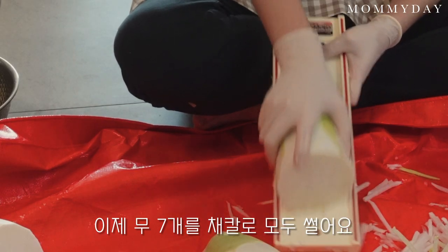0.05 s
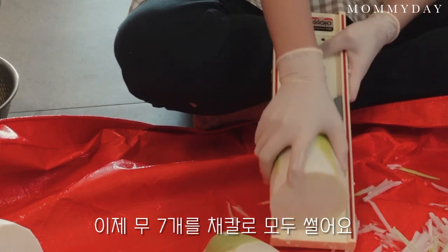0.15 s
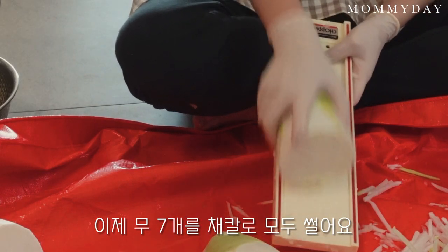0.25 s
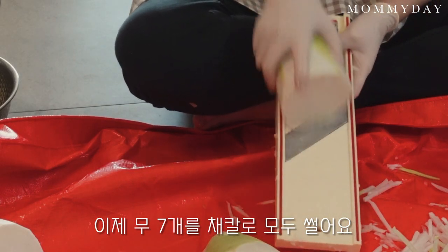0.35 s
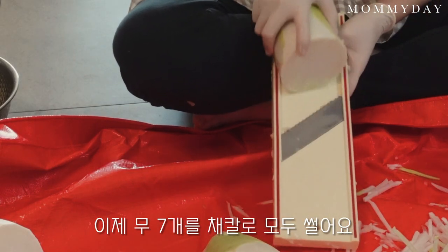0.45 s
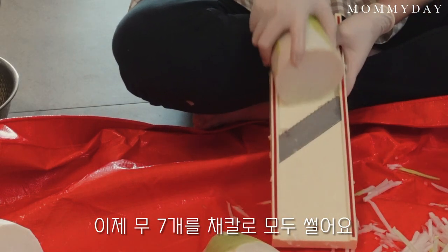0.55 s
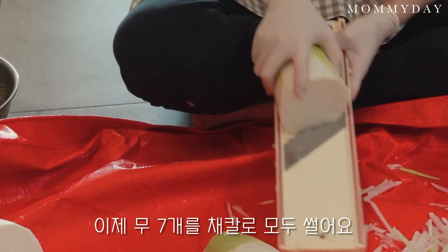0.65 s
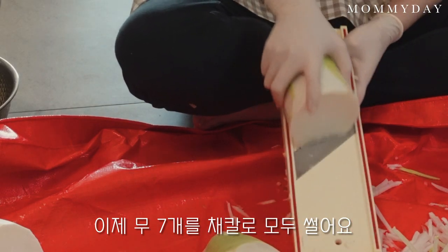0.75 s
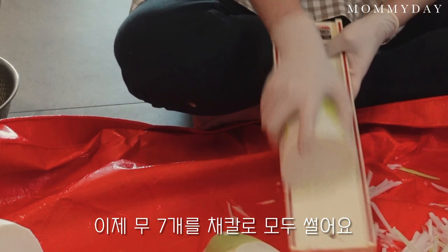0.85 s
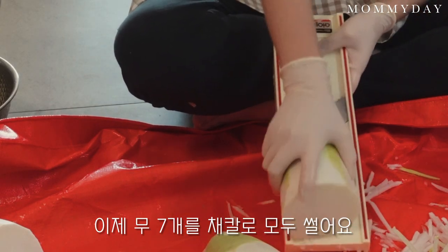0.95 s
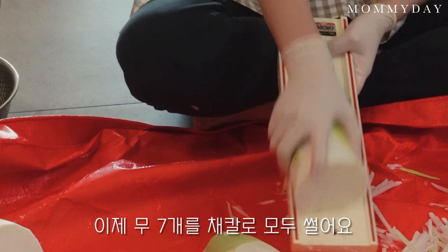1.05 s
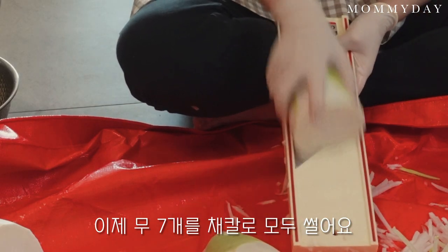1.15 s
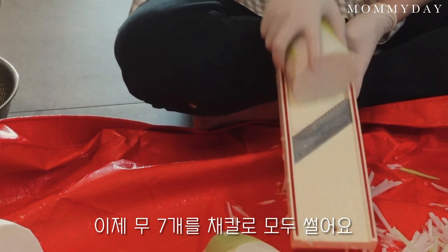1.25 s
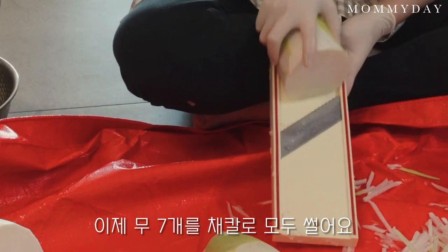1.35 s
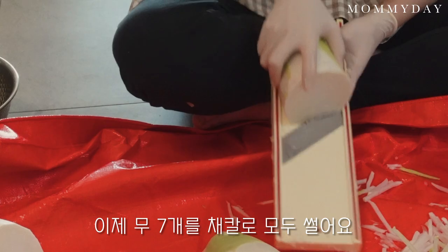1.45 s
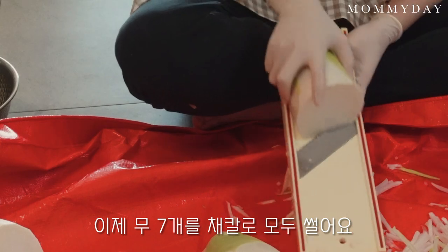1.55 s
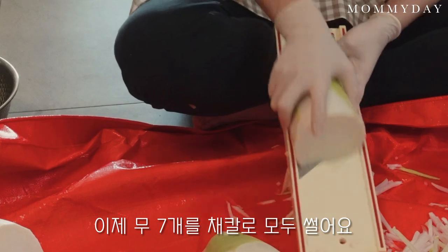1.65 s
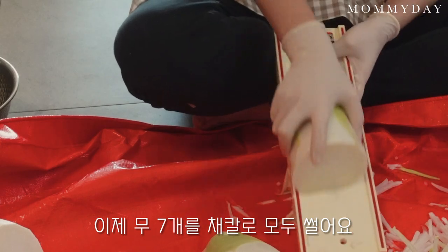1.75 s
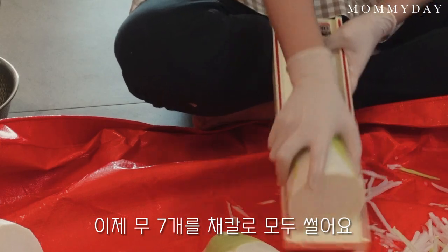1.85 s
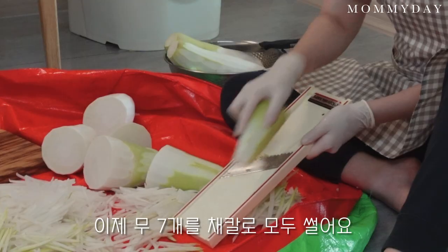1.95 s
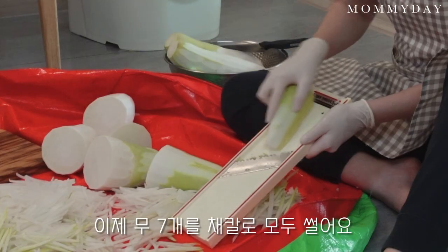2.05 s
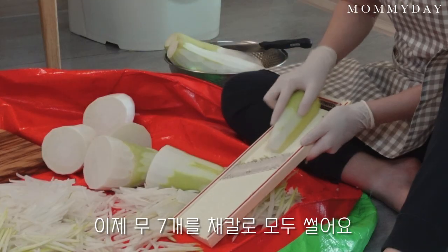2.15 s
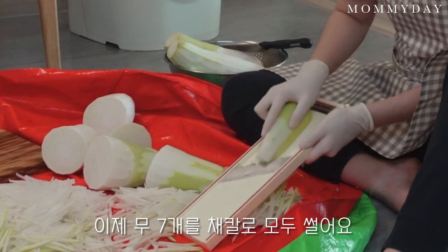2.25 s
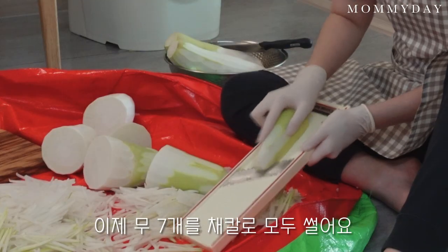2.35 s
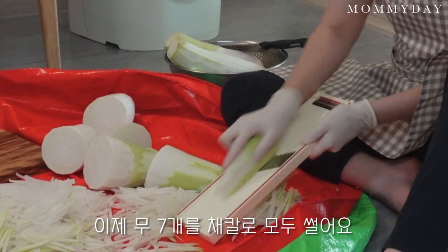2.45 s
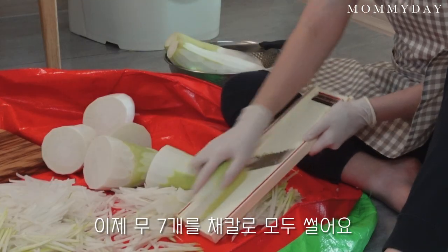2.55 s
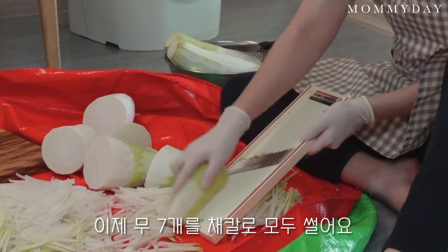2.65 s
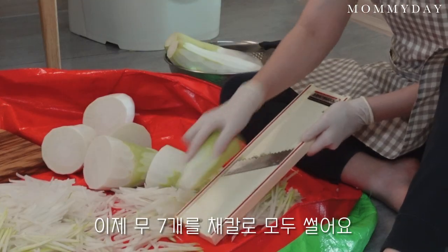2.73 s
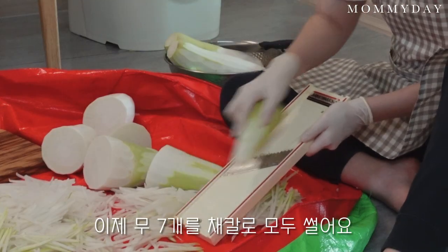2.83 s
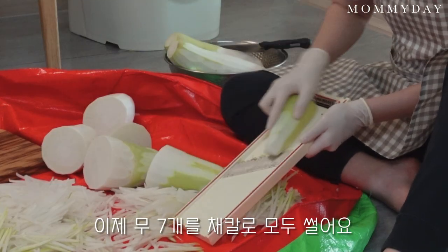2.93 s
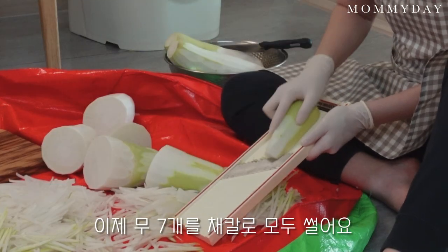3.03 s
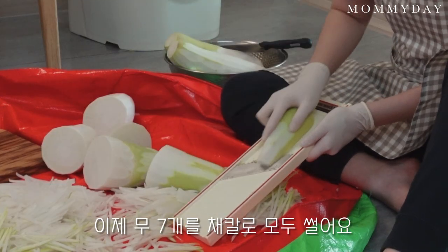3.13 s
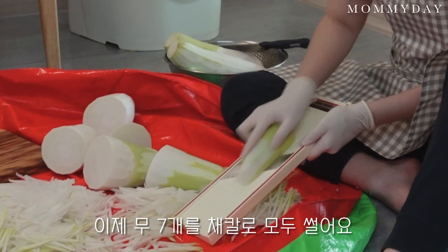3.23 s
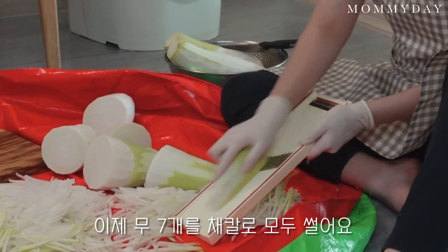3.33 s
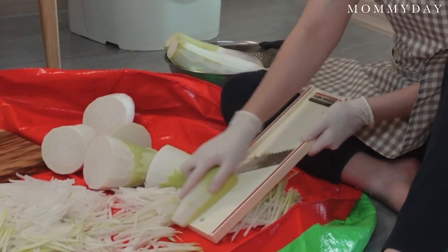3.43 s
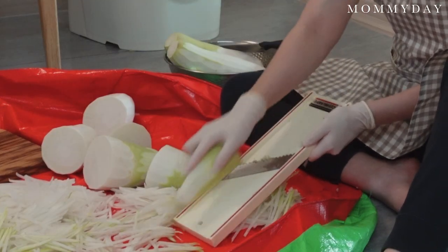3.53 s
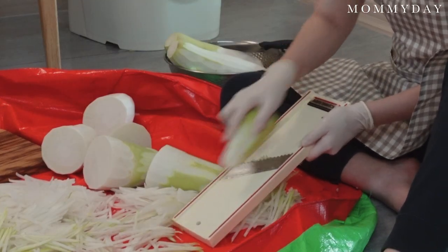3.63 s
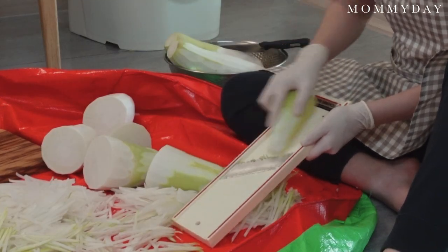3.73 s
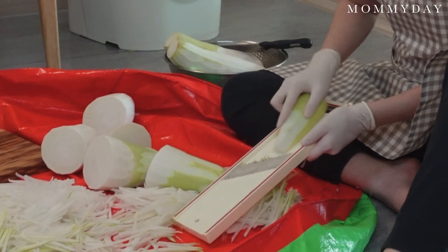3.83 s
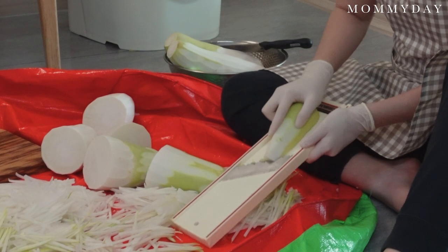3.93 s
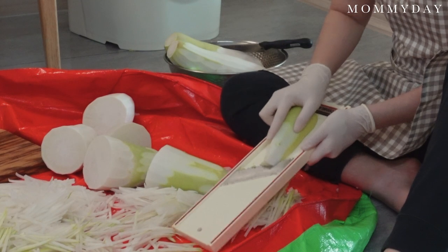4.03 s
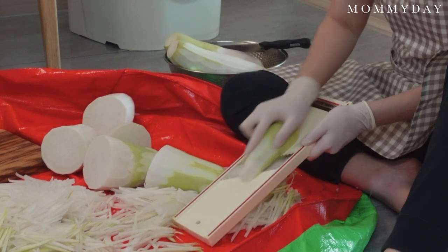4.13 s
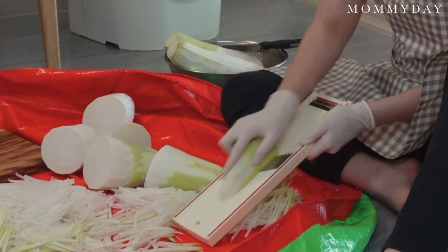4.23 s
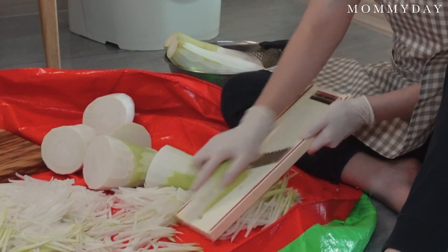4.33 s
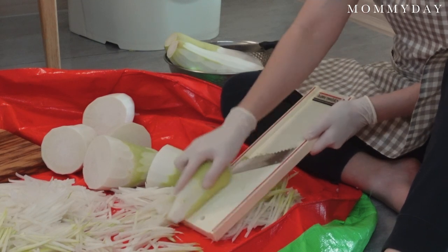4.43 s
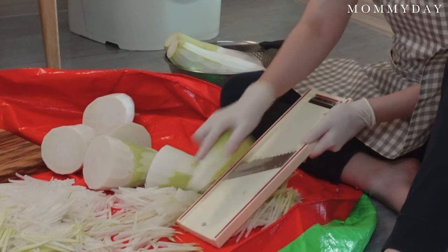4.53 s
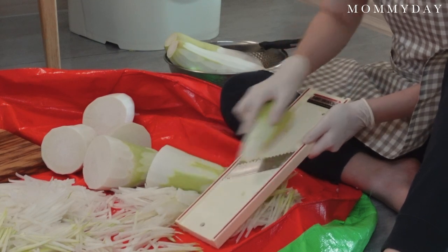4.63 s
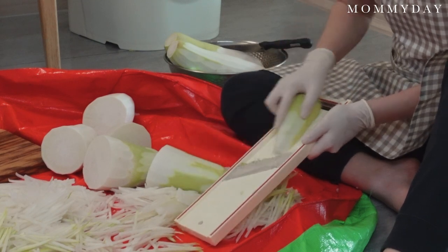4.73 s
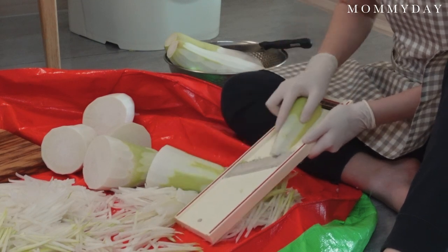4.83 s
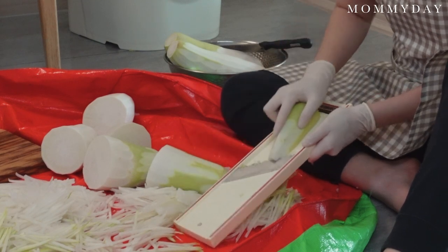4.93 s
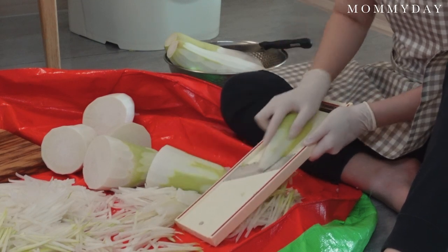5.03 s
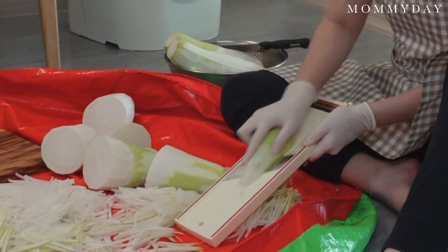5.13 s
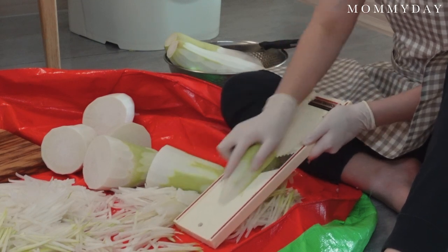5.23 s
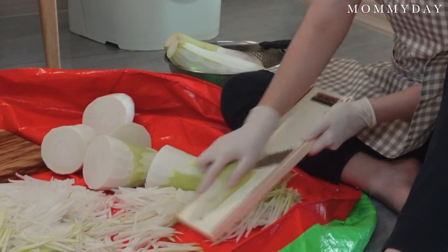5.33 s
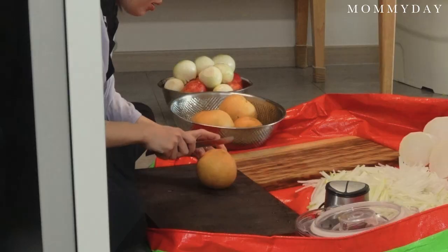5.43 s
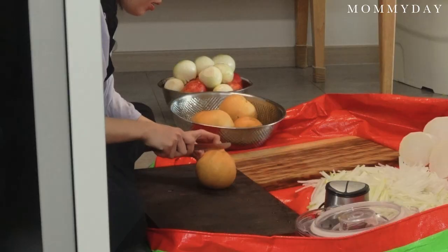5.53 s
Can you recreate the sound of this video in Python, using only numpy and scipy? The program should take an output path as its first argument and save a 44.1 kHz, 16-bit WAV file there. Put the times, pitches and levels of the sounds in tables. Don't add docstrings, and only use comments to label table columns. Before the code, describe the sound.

A radish scrapes over steel teeth: quick pushes and light grazes crowd the first two seconds, with sharp wooden knocks near 0.7 and 1.6. An abrupt cut follows, then the hardest double clack near 2.4 and progressively longer crisp slices, each preceded by rattles. It ends with faint knife contacts after another cut. Nearby microphone, mostly central, in a bare, briefly ringing kitchen with low background hum.

```python
import sys
import numpy as np
from scipy import signal
from scipy.fft import rfft, irfft, next_fast_len
from scipy.io import wavfile
from scipy.ndimage import uniform_filter1d

SR = 44100
rng = np.random.default_rng(int(sys.argv[2]) if len(sys.argv) > 2 else 0)


def gain_from_db(level_db):
    decades = np.asarray(level_db, float) / 20
    return 10 ** decades


def int16_out(signal):
    q = np.round(np.clip(np.atleast_2d(signal).T, -1, 1) * 32767)
    wavfile.write(sys.argv[1], SR, q.astype(np.int16))


N = 246078
HZ = np.fft.rfftfreq(next_fast_len(N), 1 / SR) + 1e-3
SCENE_CHANGES_S = (1.917, 5.417)

# (start [s], rise [s], hold [s], blade level [dB], board level [dB])
CUTS = [
    (0.0, 0.0013, 0.042, -24.5, -36.5),
    (.754, .022, 0.076, -21, -31.5),
    (1.577, 0.031, 0.09, -18, -36.5),
    (2.34, 0.039, 0.11, -23, -29.5),
    (3.075, .15, 0.14, -22, -33.5),
    (4.057, 0.045, 0.2, -20.5, -34.5),
    (4.996, 0.074, .26, -21.5, -36.5),
]
# (start [s], rise [s], hold [s], blade level
# [dB], board level [dB])
GRAZES = [(.208, 0.014, 0.076, -42, -47), (.382, 0.0016, 0.0027, -30, -56),
          (.42, 0.011, 0.056, -46, -60), (.55, 0.027, .02, -44, -65), (.6, 0.028, 0.011, -21, -34.5),
          (.69, 0.05, .05, -38.5, -35.5), (.88, .02, 0.011, -31, -37),
          (1.175, 0.034, 0.044, -36.5, -44), (1.283, .01, 0.093, -46.5, -45),
          (1.409, .04, 0.012, -23.5, -46), (1.53, 0.027, 0.023, -39.5, -45),
          (1.64, .015, 0.024, -22, -42), (1.7, 0.032, 0.054, -25.5, -32),
          (1.79, 0.0084, 0.077, -33.5, -48), (1.03, 0.0075, 0.019, -46.5, -61),
          (3.03, 0.016, 0.11, -38.5, -39.5), (4.722, .005, .01, -55, -60),
              (4.953, 0.022, .03, -47, -49), (2.06, 0.021, 0.037, -54, -65),
              (2.193, 0.027, .11, -39.5, -34.5), (2.931, .005, 0.037, -51.5, -55),
              (2.981, 0.0091, 0.023, -48, -41), (3.894, 0.028, 0.012, -31.5, -31),
              (4.026, 0.053, 0.011, -36, -33.5), (3.49, 0.025, .1, -57, -62), (4.51, .01, 0.076, -58, -58),
              (4.847, 0.024, 0.025, -35, -37.5), (5.42, 0.003, .012, -35.5, -37),
              (5.5, 0.056, .05, -48, -55)]
# (time [s], level [dB], length [s])
FIBRE_SNAPS = [(.21, -31, .008), (.384, -26, .005), (.606, -30, .01), (1.16, -42, .01), (1.283, -42, .006),
               (1.411, -34, .01), (1.588, -24, .008), (1.905, -37, .006), (2.195, -40, .006),
               (2.2, -31, .012), (2.216, -35, .008), (2.39, -16, .008), (2.405, -21, .008),
               (2.955, -43, .006), (2.993, -40, .012), (3.789, -45, .008), (3.898, -35, .01),
               (4.035, -36, .01), (4.1215, -19.5, .006), (4.127, -22, .004), (4.504, -43, .012),
               (4.741, -48, .008), (4.85, -36, .012)]
# (frequency [Hz], density [dB per Hz])
TEAR_SPECTRUM = [(2200, 11.5), (3000, 6.5), (3650, -2.5), (4830, 2.5), (6440, 5), (8340, -3.5),
                 (11500, -8.5), (15000, -7)]
# (frequency [Hz], width [Hz], level [dB])
BLADE_MODES = [(2590, 170, 2.5), (3197, 74, 8), (3660, 790, 6), (4155, 33, 11), (4400, 160, -46),
               (5684, 140, 3.5), (6000, 190, -8), (8200, 260, -55), (8050, 1000, -9.5), (10130, 190, -20)]
# (frequency [Hz], width [Hz], level [dB])
BOARD_MODES = [(265.4, 51, -15), (372, 39, -3.5), (440.3, 24.3, -3), (562, 72, -2.5), (691.3, 54, -1.5),
               (819, 91, 0), (993, 115, -8), (1108, 25, 1.5), (1338, 140, -7.5), (1580, 110, -3),
               (1914, 185, -11.5), (2190, 102, -3), (2823, 230, -8.5)]
# (time [s], length [s], level [dB], hardness [-1 dull to 1 sharp])
RATTLES = [(0.227, 0.036, -44, -0.22), (.385, .03, -49, -1.1), (0.658, .08, -33.5, -0.29),
           (0.943, 0.091, -46.5, -0.76), (1.27, 0.059, -53, -0.75), (1.621, 0.24, -36, -0.23),
           (1.881, 0.049, -41, 0.053), (2.046, .025, -52.5, -0.94), (2.076, 0.026, -51, -1.1),
           (2.126, .04, -56.5, -.7), (2.404, 0.021, -19, 0.5), (2.932, .02, -39.5, 0.088),
           (2.952, 0.048, -35, 0.039), (3.07, 0.12, -36, 0.45), (3.5, .08, -65, -.7),
           (3.772, 0.013, -36, -0.52), (3.786, 0.013, -28.5, 0.33), (3.854, .03, -39, -0.0082),
           (3.947, 0.077, -36, 0.33), (4.107, 0.038, -27, 0.75), (4.396, 0.025, -53, -1.05),
           (4.503, .1, -64, -0.7), (4.719, 0.023, -40, -0.99), (4.74, 0.057, -32, 0.23),
           (5.011, 0.016, -31, 1), (5.417, 0.022, -29, -0.23), (5.486, 0.014, -38, 0.32)]
# (time [s], length [s], level [dB], hardness [-1 dull to 1.7 very sharp])
SCRAPES = [(.0, 0.027, -43, 0.85), (.56, .03, -52, 1.3), (.765, 0.076, -36, 1.44),
           (1.285, 0.14, -47.5, 1.48), (1.423, 0.058, -40, 1.74), (1.574, 0.019, -36.5, 1.6),
           (2.2, .025, -45.5, 1.4), (2.234, 0.077, -38, 0.11), (3.34, .05, -33, 0.55),
           (5.216, 0.2, -40, .3), (4.858, .03, -52, 0.86), (5.54, .03, -45, 1.28)]
# (time [s], peak [dB], centre [Hz], rattle length [s])
KNOCKS = [
    (0.209, -26, 387, 0.011),
    (0.385, -26.5, 515, 0.041),
    (0.658, -10.5, 1500, 0.0077),
    (0.96, -27, 378, 0.021),
    (1.262, -23, 425, 0.019),
    (1.618, -4.5, 1580, 0.0076),
    (1.718, -13.5, 820, 0.014),
    (1.87, -16, 900, 0.011),
          (2.048, -38, 463, 0.02), (2.076, -30, 440, 0.0092), (2.099, -35, 385, 0.013),
              (2.135, -37, 400, 0.009), (2.216, -27, 746, 0.011), (2.314, -21.5, 710, 0.011),
              (2.425, -6.5, 790, 0.012), (2.432, -3, 1540, 0.0044), (2.441, -1.5, 1200, 0.013),
              (2.932, -29, 778, 0.012), (2.954, -19.5, 1000, 0.021), (3.777, -22, 746, 0.0098),
              (3.789, -9, 1320, 0.032), (3.888, -22.5, 460, 0.04), (4.108, -11, 1390, 0.036),
              (4.396, -28, 426, 0.016), (4.719, -27, 533, 0.0097), (4.74, -11.5, 1390, 0.034),
              (4.773, -14, 1350, 0.027), (4.794, -26, 1350, 0.012), (5.016, -20.5, 487, 0.055),
              (5.42, -20.5, 670, 0.026), (5.433, -19.5, 675, 0.013), (5.491, -17, 1310, 0.013),
              (5.526, -23.5, 1240, 0.014)]
# (frequency [Hz], time to fall 60 dB [s])
ROOM_DECAY = [(150, 0.36), (1000, 0.4), (5000, 0.36), (14000, 0.39)]
# (frequency [Hz], level [dB])
ROOM_SIDE = [(30, -8), (120, -14.5), (300, -12), (700, -4.5), (2000, -9.5), (5000, -13.5), (9000, -21),
             (14000, -19)]
# (frequency [Hz], density [dB per Hz])
FLOOR_SPECTRUM = [(15, -84), (25, -39), (123, -8), (149, -4), (190, -0.5), (394, -7.5), (840, -14.5),
                  (1190, -14), (1290, -15), (4740, -23.5), (14000, -28.5), (16000, -29)]

# (first touch below peak [dB], sag while held [dB/s], blade fade [dB/s], board fade [dB/s])
CUT_SHAPE, GRAZE_SHAPE = (5.8, 7.3, 230, 105), (9.3, 35, 280, 140)
# (top of hiss [dB re blade], rasp [dB re blade], thud [dB re board])
CUT_MIX, GRAZE_MIX = (-1.84, -8.5, -10.5), (-3.5, -3, -10.5)
# (first touch below peak [dB], sag [dB/s], fade [dB/s], brush [dB])
RATTLE_SHAPE = (3.7, 68, 290, 25)
RUSTLE_DB = (-54.5, -76, -49.5)
# (hiss [dB], top [dB], rasp [dB], drumming [dB], thud [dB])
RUSTLE_MIX_DB = (2.5, 0, 0, 0.5, -2)
THUD_DB, HUM_DB = (4, 0.5, -1.5), (4, -1, -4)


def tearing(tear_db, top_db):
    cells = crackle(rate=1500., spread_db=3.7, flicker_db=1.3)
    hiss = 0.6 * cells + wander(cells, BLADE_MODES, wander_db=6, rate=21.98)
    flesh = gain_from_db(shape(TEAR_SPECTRUM))
    body = level(filt(hiss, flesh * band(3356, 12600)))
    top = level(filt(hiss, flesh * band(9820, 16200)))
    snaps = bursts(FIBRE_SNAPS, attack_s=0.0003) * level(filt(hiss, band(2200, 24000)))
    return gain_from_db(tear_db) * body + gain_from_db(top_db) * top + snaps


def sliding(rasp_db, drum_db, thud_db):
    slips = crackle(rate=600., spread_db=4.5, flicker_db=2.0)
    shake = 0.16 * slips + wander(slips, BOARD_MODES, wander_db=4, rate=16.)
    rasp = level(filt(shake, band(1685, 4030)), -0.81)
    drum = level(filt(shake, band(530, 1920)), -0.81)
    thud = level(filt(shake, band(148, 521)), -0.81)
    return gain_from_db(rasp_db) * rasp + gain_from_db(drum_db) * drum + gain_from_db(thud_db) * thud


def knocks():
    delay_s = .001
    out, age = np.zeros(N + SR), np.arange(SR // 8) / SR
    for s, db, hz, length in KNOCKS:
        chance = rng.random((2, len(age)))
        bounces = (chance[0] < 800. / SR) * (2 * chance[1] - 1)
        force = bounces * np.exp(-age / max(length, .001))
        force[0] = 1.2
        b, a = signal.iirpeak(hz, 1.1, fs=SR)
        sharp = signal.lfilter(b, a, force)
        blow = signal.lfilter(b, a, sharp) + 0.025 * sharp
        out[int((s + delay_s) * SR):][:len(age)] += gain_from_db(db) * blow / np.abs(blow).max()
    return gain_from_db(-1.3) * filt(out[:N], board() + 0.98)


def board():
    return sum((-1) ** k * gain_from_db(db) * ring(hz, width) for k, (hz, width, db) in enumerate(BOARD_MODES))


def effort():
    rasp_base_db, rasp_per_hardness_db = -15.5, 16.5
    thud_base_db, thud_per_hardness_db = -3, -11
    brisk_db, dull_db_per_db = -26, 0.02
    t = np.arange(0, N + 32, 32) / SR
    setting = np.searchsorted(SCENE_CHANGES_S, t)
    power = gain_from_db(2 * np.array(RUSTLE_MIX_DB))[:, None] * gain_from_db(2 * np.array(RUSTLE_DB)[setting])

    passes = ((CUTS, CUT_SHAPE, CUT_MIX), (GRAZES, GRAZE_SHAPE, GRAZE_MIX))
    for rows, (touch, sag, blade_fade, board_fade), (top, rasp, thud) in passes:
        for s, rise, hold, blade_db, board_db in rows:
            blade = contact(t, s, rise, hold, touch, sag, blade_fade)
            wood = contact(t, s, rise, hold, touch, sag, board_fade)
            power[:3] += gain_from_db(2 * (blade_db + np.array([[0], [top], [rasp]]))) * blade
            power[3:] += gain_from_db(2 * (board_db + np.array([[0], [thud]]))) * wood

    for s, length, db, hard in RATTLES + SCRAPES:
        rasp = rasp_base_db + rasp_per_hardness_db * hard
        thud = thud_base_db + thud_per_hardness_db * hard
        mix_db = db + np.array([[rasp], [0], [thud]])
        power[2:] += gain_from_db(2 * mix_db) * contact(t, s, 0.0045, length, *RATTLE_SHAPE)

    power[1] *= (power[0] / gain_from_db(2 * brisk_db)) ** dull_db_per_db
    power[4] *= gain_from_db(2 * np.array(THUD_DB)[setting])
    return [np.interp(np.arange(N) / SR, t, 10 * np.log10(p)) for p in power]


def contact(t, start, rise, hold, touch_db, sag, fade, brush_db=13):
    approach_s = 0.0087
    knee_db, drip_db_per_s = 23, 117
    rise, hold = max(rise, .001), max(hold, .001)
    touch_db = touch_db + 56 * rise
    durations = [start - approach_s, approach_s - .001, .001, rise, hold, knee_db / fade, 60 / drip_db_per_s]
    end_db = -sag * hold
    before_db = [-touch_db - 3 * brush_db, -touch_db - brush_db, -touch_db]
    after_db = [0, end_db, end_db - knee_db, end_db - knee_db - 67]
    same = np.searchsorted(SCENE_CHANGES_S, t) == np.searchsorted(SCENE_CHANGES_S, start)
    return same * gain_from_db(2 * np.interp(t, np.cumsum(durations), before_db + after_db, left=-120))


def wander(force, modes, wander_db, rate):
    out = 0
    for k, (hz, width, db) in enumerate(modes):
        gain = gain_from_db(db + wander_db * np.tanh(walk(rate)))
        out = out + (-1) ** k * gain * filt(force, ring(hz, width))
    return out


def crackle(rate, spread_db, flicker_db):
    hit = rng.random(N) < rate / SR
    size = gain_from_db(spread_db * np.minimum(rng.exponential(size=N), 4))
    pops = hit * size * rng.standard_normal(N)
    flicker = gain_from_db(flicker_db * (walk(30) + walk(140)))
    return level((rng.standard_normal(N) + pops) * flicker)


def bursts(rows, attack_s):
    out, age = np.zeros(N + SR), np.arange(SR // 4) / SR
    for s, db, length in rows:
        envelope = np.minimum(age / attack_s, 1) * np.exp(-age / max(length, .001))
        out[int(s * SR):][:len(age)] += gain_from_db(db) * envelope
    return out[:N]


def ring(hz, width):
    return 1j * HZ * width / (hz ** 2 - HZ ** 2 + 1j * HZ * width)


def walk(rate):
    k = int(SR / rate)
    held = np.repeat(rng.standard_normal(N // k + 1), k)
    return 0.88 * uniform_filter1d(held, k)[:N]


def level(x, db=0):
    return x * gain_from_db(db) / np.sqrt(np.mean(x ** 2))


def shape(table):
    hz, value = np.transpose(table)
    return np.interp(np.log(HZ), np.log(hz), value)


def filt(x, response):
    size = next_fast_len(N)
    return irfft(rfft(x, size) * response, size)[..., :N]


def band(lo_hz, hi_hz):
    return 1 / np.sqrt((1 + (lo_hz / HZ) ** 12) * (1 + (HZ / hi_hz) ** 12))


def room(dry):
    t, noise, tail = np.arange(SR) / SR, rng.standard_normal((2, SR)), 0
    decay_hz, decay_s = np.transpose(ROOM_DECAY)
    for hz in 90 * 2 ** np.arange(8):
        t60 = np.interp(np.log(hz), np.log(decay_hz), decay_s)
        edges_hz = [hz / np.sqrt(2), hz * np.sqrt(2)]
        octave = signal.butter(3, edges_hz, "band", fs=SR, output="sos")
        tail = tail + signal.sosfilt(octave, noise) * gain_from_db(-60 * t / t60)
    tail = tail * np.minimum(t / 0.0044, 1)
    tail = tail * gain_from_db(-13.5) / np.sqrt(np.sum(tail[0] ** 2))
    parts = np.split(dry, [int(s * SR) for s in SCENE_CHANGES_S])
    wet = np.hstack([signal.fftconvolve(part[None], tail, axes=1)[:, :len(part)] for part in parts])
    return wet[0], filt(wet[1], gain_from_db(shape(ROOM_SIDE)))


def floor():
    mid, side = filt(rng.standard_normal((2, N)), gain_from_db(shape(FLOOR_SPECTRUM[:-1])))
    setting = np.searchsorted(SCENE_CHANGES_S, np.arange(N) / SR)
    both = np.array([mid, filt(side, gain_from_db(shape(ROOM_SIDE) + 5.0))])
    both = both + (gain_from_db(np.array(HUM_DB)[setting]) - 1) * filt(both, band(20, 260))
    swell_db = 1.2 * walk(2.47)
    return both * gain_from_db(-53.5 + swell_db) / np.sqrt(np.mean(mid ** 2))


def scene():
    tear_db, top_db, *board_db = effort()
    dry = tearing(tear_db, top_db) + sliding(*board_db) + knocks()
    dry = filt(dry, band(110, 20000))
    wet_mid, wet_side = room(dry)
    floor_mid, floor_side = floor()
    mid = gain_from_db(-3.5) * dry + wet_mid + floor_mid
    side = wet_side + floor_side + 0.026 * dry - 0.11 * filt(dry, band(40, 420))
    side = side + 0.041 * np.gradient(dry)
    return np.array([mid + side, mid - side])


def top_cut(x):
    return signal.sosfilt(signal.butter(12, 16520, fs=SR, output="sos"), x)


def record(dry):
    low_pass = signal.ellip(10, .2, 55, 15650, fs=SR, output="sos")
    mix = signal.sosfilt(low_pass, dry)
    return top_cut(mix)


dry = scene()
out = record(dry)
int16_out(out)
```